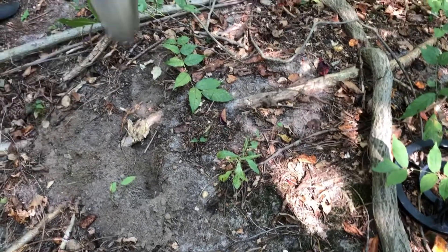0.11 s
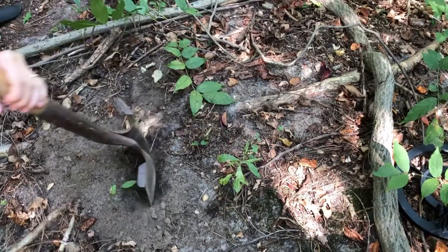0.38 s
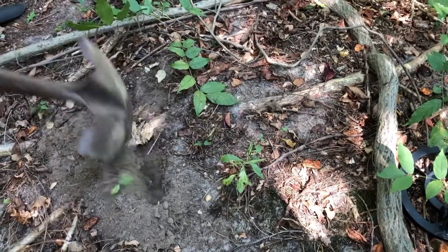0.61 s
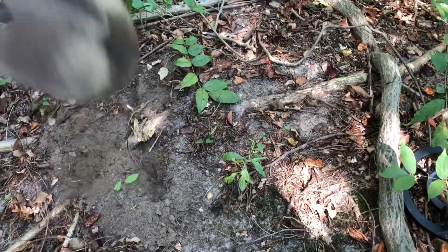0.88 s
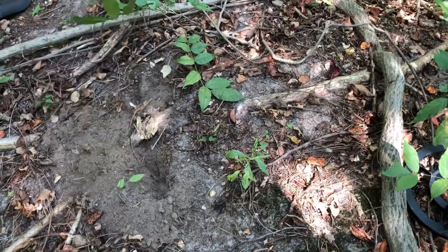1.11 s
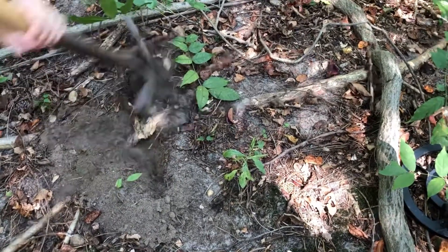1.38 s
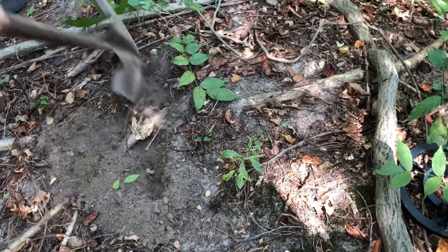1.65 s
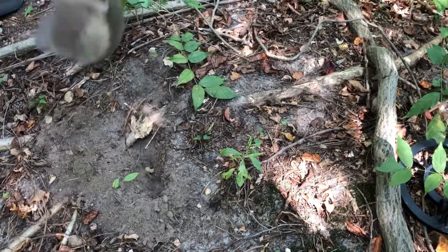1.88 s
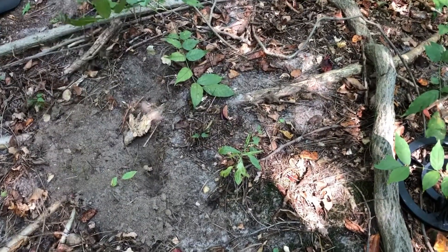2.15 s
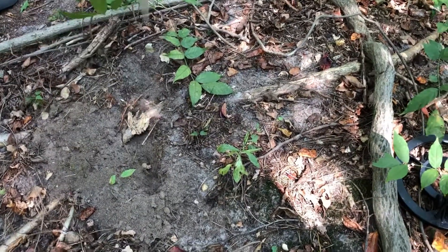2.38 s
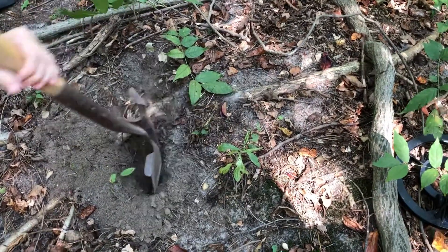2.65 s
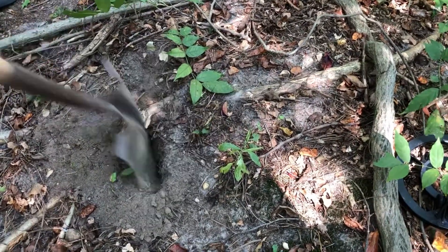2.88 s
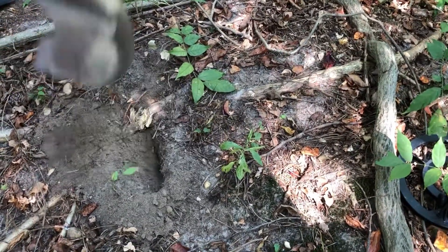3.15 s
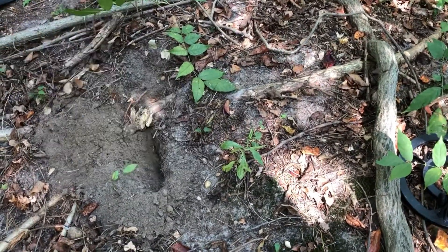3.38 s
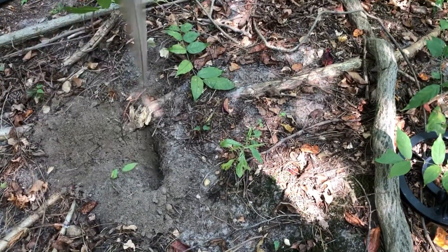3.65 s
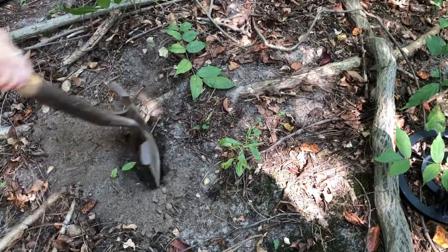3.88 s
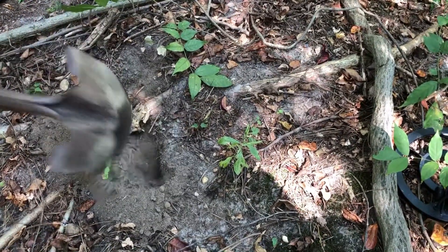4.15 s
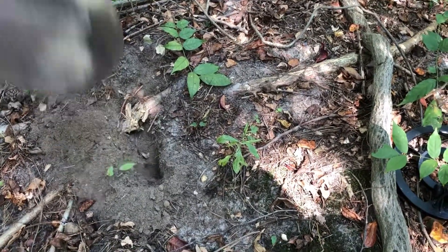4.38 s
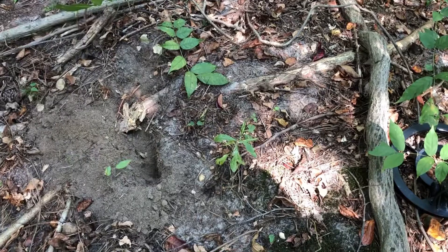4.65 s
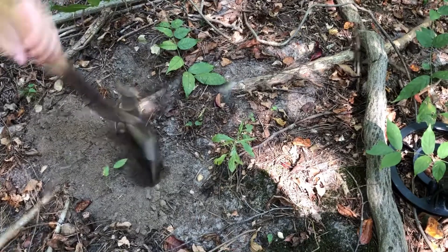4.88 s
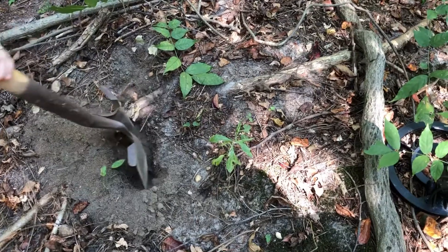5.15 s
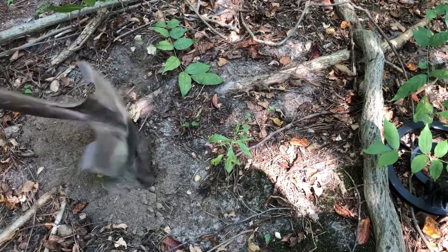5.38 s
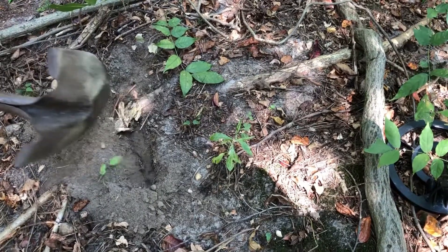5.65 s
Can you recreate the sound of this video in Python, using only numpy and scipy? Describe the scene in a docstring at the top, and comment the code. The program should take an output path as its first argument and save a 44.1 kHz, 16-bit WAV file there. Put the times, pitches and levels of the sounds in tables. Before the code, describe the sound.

Five evenly spaced, dull, gritty blows of a digging tool into woodland ground, with sliding dirt, small clicks and quiet crickets.

```python
"""Chopping rooty forest soil

A steel mattock chops five times: each thud glides down in pitch and booms in the ground, and earth crunches as grit.
Dragged free, the blade scrapes as sliding earth and rings in decaying modes; rootlets and crumbs are noise bursts.
Crickets chirp in arched tones, a faint far whistle is tones blurred by fast pitch shake,
and distant traffic and air are coloured noise."""
import sys
import numpy as np
from scipy import signal
from scipy.fft import rfft, irfft, next_fast_len
from scipy.io import wavfile
from scipy.ndimage import uniform_filter1d, map_coordinates

SR = 44100
rng = np.random.default_rng(int(sys.argv[2]) if len(sys.argv) > 2 else 0)


def waveform_to_disk(signal):
    """Save audio, clipped to [-1, 1], as 16-bit WAV at the path in sys.argv[1]."""
    frames = np.transpose(np.atleast_2d(signal))
    scaled = np.clip(frames, -1, 1) * 32767
    samples = np.round(scaled).astype(np.int16)
    wavfile.write(sys.argv[1], SR, samples)


def undo_db(level):
    """Turn decibels back into plain size, where 20 dB means ten times bigger."""
    steps = np.asarray(level, float) / 20
    return 10 ** steps


N = 254542  # length [samples]


def unit(x):
    """Normalisation: x scaled to rms 1."""
    return x / np.sqrt(np.mean(x ** 2) + 1e-20)


def along(points, hz):
    """Spectral interpolation: (frequency [Hz], value) points read on a log frequency axis."""
    f, value = np.transpose(points)
    return np.interp(np.log(hz + 1), np.log(f + 1), value)


def filtered(x, response):
    """Linear filtering: the spectrum of x times a complex response of frequency."""
    m = next_fast_len(N + 8192)
    return irfft(rfft(x, m) * response(np.fft.rfftfreq(m, 1 / SR)), m)[:N]


def wobble(rate):
    """Slow random modulation: a smooth curve through random knots, rate of them a second."""
    knots = rng.standard_normal(int(N * rate / SR) + 4)
    return map_coordinates(knots, [np.arange(N) * rate / SR])


def add(track, s, sound):
    """Superposition: mix sound into track from second s on."""
    part = track[max(round(s * SR), 0):][:len(sound)]
    part += sound[:len(part)]


# colour of far traffic and air: (frequency [Hz], relative level per Hz [dB])
WOODS_COLOUR = [(15, -2.5), (25, -35), (59, -0.5), (94, 6.5), (120, -4), (180, -13.5), (277, -21),
                (1100, -18), (2280, -31), (4490, -40), (6560, -38), (7920, -32.5), (9320, -46),
                (16000, -42.5)]
# swell of the far rumble: (time [s], relative level [dB])
TRAFFIC_SWELL = [(0, -3.5), (2, -0.5), (3, 1), (5.77, 1)]


def woods():
    """Coloured noise: far traffic and air, with the rumble swelling apart from the hiss."""
    t = np.arange(N) / SR
    colour = lambda hz: undo_db(along(WOODS_COLOUR, hz))
    low = lambda hz: 1 / (1 + (hz / 200) ** 4)
    rumble = filtered(rng.standard_normal(N), lambda hz: colour(hz) * low(hz))
    hiss = filtered(rng.standard_normal(N), lambda hz: colour(hz) * (1 - low(hz)))
    rumble *= undo_db(np.interp(t, *np.transpose(TRAFFIC_SWELL)) + 0.48 * wobble(2.9))
    hiss *= undo_db(0.31 * wobble(3.14))
    return undo_db(-53.5) * unit(rumble + hiss)


def chirp(hz, length_s, arch):
    """Frequency modulation: one wing stroke whose pitch arches up to hz and down again."""
    u = np.linspace(-1, 1, round(length_s * SR))
    phase = 2 * np.pi * np.cumsum(hz * (1 - arch * u * u)) / SR
    return (1 - u * u) * np.sin(phase)


# beat of the near cricket: (time [s], chirps so far [count])
CRICKET_BEAT = [(.014, 0), (1.252, 11), (2.973, 26), (4.461, 39), (4.802, 42), (5.571, 49), (5.689, 50)]


def crickets():
    """Stridulation: a near cricket on its beat, a lower one answering, and a far chorus at random."""
    out = np.zeros(N)
    s, count = np.transpose(CRICKET_BEAT)
    for start in np.interp(np.arange(count[-1] + 1), count, s):
        near_db, answer_db = -66.5 + rng.normal(0, 1.1), -76.5 + rng.normal(0, 4.7)
        add(out, start - 0.006, undo_db(near_db) * chirp(8750, 0.02, arch=0.049))
        add(out, start + 0.019, undo_db(answer_db) * chirp(7050, 0.019, arch=0.092))
    for when, pitch, size in rng.random((1600, 3)):
        far = chirp(8150 - 950 * pitch ** 1.5, 0.022, arch=0.036)
        add(out, when * N / SR, undo_db(-86.0 + 13.3 * size) * far)
    return out


# course of the far whistle: (time [s], mean pitch [Hz], mean level [dB])
WHISTLE_COURSE = [(2.989, 2640, -67.5), (3.06, 2715, -66.5), (3.15, 2526, -62.5), (3.28, 2680, -70.5),
                  (3.34, 2680, -72)]


def whistle():
    """Random frequency modulation: a tone and its octave whose pitch shakes so fast that they blur."""
    s, hz, db = np.transpose(WHISTLE_COURSE)
    t = np.arange(N) / SR
    pitch = np.interp(t, s, hz)
    low, high = (2 * np.pi * np.cumsum(pitch * (1 + shake * wobble(900))) / SR for shake in (0.15, 0.045))
    octave_db = np.interp(t, s, [0, -1.5, -13, -2, -2])  # the octave dips midway
    level = undo_db(np.interp(t, s, db, -120, -120) + 2.5 * wobble(55))
    return level * (np.sin(low) + undo_db(octave_db) * np.sin(2 * high))


# colour of breaking earth: (frequency [Hz], relative level per Hz [dB])
EARTH_COLOUR = [(350, 2), (600, 0.5), (834, -5), (1570, -1.5), (1880, -2), (3040, 0.5), (4650, -1),
                (10700, 2), (16000, -10)]


def grit(spread_db, clump_db, patch_db):
    """Granular noise: dense grains of uneven size in clumps of differing pitch, coloured like breaking earth."""
    sizes = undo_db(spread_db * wobble(900) + clump_db * wobble(160))
    spectrum = signal.stft(sizes * rng.standard_normal(N), nperseg=256)[2]
    patches = uniform_filter1d(rng.standard_normal(spectrum.shape), size=6, axis=0)  # over frequency
    patches = uniform_filter1d(patches, size=3, axis=1)  # over time
    grains = signal.istft(spectrum * undo_db(patch_db * unit(patches)), nperseg=256)[1][:N]
    return unit(filtered(grains, lambda hz: undo_db(along(EARTH_COLOUR, hz))))


def hump(t, rows, fall_db):
    """Exponential rise and decay: power of peaks that lose fall_db over their half length on each side."""
    return sum(undo_db(db - fall_db * np.abs(t - s) / half) ** 2 for s, db, half in rows)


# the blade dragged out of the cut, ever louder until free: (free at [s], level then [dB], swell [dB/s])
DRAGS = [(.605, -45.5, 178), (1.685, -53.5, 73), (2.871, -61, 51), (4.062, -52, 72), (5.45, -42.5, 114)]
# short scrapes of the edge past stones and roots: (time [s], peak level [dB], half length [s])
SCRAPES = [(0.612, -37.5, 0.013), (1.683, -45, 0.036), (2.641, -40, 0.017), (2.907, -52.5, 0.071),
           (4.132, -41.5, 0.026), (4.145, -40, .02), (5.286, -57, .04), (5.39, -41, 0.055),
           (5.463, -32, 0.014)]
# dry leaves stirred nearby: (time [s], peak level [dB], half length [s])
RUSTLES = [(.06, -64, 0.051), (1.208, -67.5, 0.046), (1.78, -65, 0.024), (2.08, -80, 0.033), (3.25, -72, 1),
           (3.42, -61.5, 0.11), (4.27, -60, 0.075)]


def loose_earth_db(still_db=-82, trickle_db=-62, trickle_fall=36, free_fall=439):
    """Incoherent addition: still litter, trickle into each cut, drags, scrapes and rustles add as powers."""
    t = np.arange(N) / SR  # both falls are in dB per second
    power = undo_db(still_db) ** 2 + hump(t, SCRAPES, fall_db=16) + hump(t, RUSTLES, fall_db=10.5)
    for s, *_ in CUTS:
        power += (t > s) * undo_db(trickle_db - trickle_fall * (t - s)) ** 2
    for s, db, swell in DRAGS:
        slope = np.where(t < s, swell, free_fall)
        power += undo_db(db - slope * np.abs(t - s)) ** 2
    return 10 * np.log10(power)


def slide(width_hz=110, quiet_db=-65, loud_db=-40):
    """Damped resonance: the harder earth grinds, the more it sounds through the blade's soil-damped modes."""
    db = loose_earth_db()

    def crumbly(hz):  # about half the amplitude well below 2.5 kHz and well above 10.5 kHz
        return (1 - 0.49 / (1 + (hz / 2500) ** 4)) * (1 - 0.5 / (1 + (10500 / (hz + 1)) ** 6))

    def damped(f):  # modes of one bandwidth and alternating sign
        total = 0
        for k, (centre, mode_db, _) in enumerate(np.concatenate(BLADE_MODES)):
            loss = 1j * f * width_hz
            total = total + (-1) ** k * undo_db(mode_db) * loss / (centre * centre - f * f + loss)
        return total

    earth = filtered(grit(spread_db=3, clump_db=1.2, patch_db=2.5), crumbly)
    share = np.interp(db, [quiet_db, loud_db], [0.05, 0.6])  # of the power
    through_blade = unit(filtered(earth, damped))
    return undo_db(db) * (np.sqrt(1 - share) * unit(earth) + np.sqrt(share) * through_blade)


# snapping rootlets and the louder falling crumbs: (time [s], peak level [dB], nominal centre [Hz])
SNAPS = [(.2895, -20, 5450), (.666, -43, 10000), (.927, -52.5, 2440), (.976, -45.5, 7160),
         (.998, -49, 11000), (1.029, -50, 5500), (1.94, -59, 8750), (3.202, -47, 6000),
         (1.395, -23.5, 2500), (2.07, -52.5, 2500), (2.274, -43.5, 5900), (2.464, -46.5, 10700),
         (2.5322, -18, 1940), (2.5425, -9.5, 6000), (2.559, -11, 11300), (2.632, -40, 4000),
         (2.646, -30.5, 2730), (2.904, -39.5, 3800), (3.412, -42, 4850), (3.572, -46, 7760),
         (3.773, -18.5, 8500), (4.049, -35.5, 5430), (5.165, -37, 4450), (5.26, -40, 9500),
         (5.284, -35.5, 3300), (5.318, -44, 7500), (5.635, -50, 10000), (5.656, -51, 4500)]


def snaps(t60=0.0054, rattle_t60=0.028, rattle_db=-9, crumbs_db=-64):
    """Impulsive noise: short band-passed bursts with a gritty rattle behind; small crumbs fall at random."""
    out, t = np.zeros(N), np.arange(SR // 30) / SR
    luck = rng.random((150, 3))
    crumbs = np.transpose([luck[:, 0] * N / SR, crumbs_db + 13 * luck[:, 1] ** 2, 2800 * 3.4 ** luck[:, 2]])
    for s, db, hz in [*SNAPS, *crumbs]:
        noise = rng.standard_normal((2, len(t)))
        burst = noise[0] * undo_db(-60 * t / t60)
        burst += noise[0] * np.abs(noise[1]) * undo_db(rattle_db - 60 * t / rattle_t60)
        band = [hz / 2.1, min(hz * 1.63, 0.33 * SR)]
        burst = signal.lfilter(*signal.butter(2, band, "bandpass", fs=SR), burst)
        add(out, s, undo_db(db) * burst / np.abs(burst).max())
    return out


# modes of the free blade, in five families that ring together: (frequency [Hz], relative level [dB], t60 [s])
BLADE_MODES = [
    [(1122, -9.5, 2.7), (1510, -12.5, 0.32)],
    [(1754, -16.5, 0.93), (1860, -17, 0.89), (2754, -12, 1.3), (3330, -16.5, 1.2)],
    [(2290, -3, 0.16), (3244, -3, 0.31), (3620, -8.5, 0.27), (5460, 0.5, 0.19)],
    [(4040, -10.5, 0.25), (4330, -6, 0.52), (4474, -5, 0.14)],
    [(6140, 3, 0.1), (6870, -3, 0.19), (7500, 3.5, 0.063), (8280, -2, 0.11), (9370, 3.5, 0.054),
     (9500, -26, .07), (10670, 3, 0.086), (12460, -28.5, 0.069)],
]
# knocks as the blade comes free: (time [s], time until it turns away [s], level of its lowest modes [dB],
# of its short modes [dB], of its middle modes [dB])
KNOCKS = [(0.61, 0.37, -52, -53.5, -45.5), (1.691, 0.13, -50, -55.5, -69), (4.128, 0.39, -47, -45, -49),
          (5.459, 0.16, -48.5, -45, -37.5)]
# second family of blade modes ringing, at some knocks and also between them:
# (time [s], time until it turns away [s], level [dB])
SECOND_FAMILY = [(0.64, 0.46, -48), (0.984, 0.25, -57.5), (1.689, 0.047, -54), (4.128, 0.49, -56.5)]


def blade(bloom=0.016, turn_s=0.07):
    """Modal synthesis: a scraping knock rings the modes at new strengths; long ones bloom as the soil lets go."""
    out, t = np.zeros(N), np.arange(SR)[:, None] / SR
    hz, mode_db, t60 = np.concatenate(BLADE_MODES).T
    sizes = [len(family) for family in BLADE_MODES]
    # one level per family; -120 dB leaves it silent
    strikes = [(s, facing_s, low, -120, short, middle, short) for s, facing_s, low, short, middle in KNOCKS]
    strikes += [(s, facing_s, -120, db, -120, -120, -120) for s, facing_s, db in SECOND_FAMILY]
    for s, facing_s, *family_db in strikes:
        luck = rng.standard_normal((2, len(hz)))
        db = mode_db + np.repeat(family_db, sizes) + luck[0] - 60 * t / t60
        db += 3.5 * np.sin(2 * np.pi * hz / 500 * t + 9 * luck[0])  # modes waver as the swinging blade turns
        rise = 1 - np.exp(-t / (bloom * np.minimum(t60, 0.6)))
        away = np.exp(-np.maximum(t - facing_s, 0) / turn_s)
        tones = np.sin(2 * np.pi * hz * t + 9 * luck[1])
        add(out, s, (undo_db(db) * rise * away * tones).sum(axis=1))
    return out


# the blade driving through earth: (time [s], length [s], entry level [dB], middle level [dB], end level [dB])
CUTS = [(0.285, 0.026, -52, -36, -30.5), (1.3927, 0.057, -34.5, -45, -38.5),
        (2.527, 0.039, -55, -23.5, -34.5), (3.762, 0.056, -34.5, -36, -33),
        (4.935, 0.033, -33.5, -32.5, -33.5)]


def cuts(spray_db=-47.5, spray_t60=0.27, stop_s=0.0069):
    """Fracture noise: earth crunches until the blade stops dead; thrown soil patters on."""
    level, t = np.zeros(N), np.arange(SR // 2) / SR
    for s, length, entry_db, middle_db, end_db in CUTS:
        course = [entry_db, middle_db, end_db, spray_db]
        db = np.interp(t, [0, length / 2, length, length + stop_s], course)
        decay_db = 60 * np.maximum(t - length, 0) / spray_t60
        add(level, s, undo_db(db - decay_db) * np.minimum(t / 0.0021, 1))
    return level * grit(spread_db=-0.5, clump_db=0.5, patch_db=1.0)


# thuds: (deepest swing [s], peak level [dB], pitch there [Hz], build-up [s], growth time constant [s])
THUDS = [(0.297, -10.5, 324.7, 0.0081, 0.0045), (1.401, -9, 276, 0.0065, 0.0012),
         (2.543, -16, 215, 0.0105, 0.0045), (3.7745, -11, 290, .009, 0.0042),
         (4.948, -11.5, 275, .0095, 0.0039)]
# modes of packed earth and roots: (frequency [Hz], relative level [dB], t60 [s])
GROUND_MODES = [(145.5, -1, 0.08), (71, -15.5, 0.23), (105, -11.5, 0.07), (215, -3, 0.052)]


def thuds(die_s=0.004, lag_s=0.0021, crack_db=-15, clod_db=-12, boom_db=-5, glide_cycles=2.79):
    """Dispersion: the ground carries high pitches faster, so each thud glides down, then the earth booms."""
    out = np.zeros(N)
    woody = signal.butter(2, [450, 1300], "bandpass", fs=SR)
    dull = signal.butter(2, [60, 260], "bandpass", fs=SR)
    since = np.arange(SR // 3) / SR
    for s, db, hz, lead, grow in THUDS:
        u = since - lead  # from the deepest swing
        t = np.maximum(u + lag_s, 0)  # from the start of the boom, lag_s before it
        turns = glide_cycles * (1 - np.exp(-u * hz / glide_cycles))
        swell = np.exp(np.minimum(u / grow, 0) - (np.maximum(u, 0) / die_s) ** 2)
        swell *= np.minimum(since / 0.00043, 1)
        thud = -swell * np.cos(2 * np.pi * turns)
        boom = 0
        for f, mode_db, t60 in GROUND_MODES:
            boom = boom + undo_db(mode_db - 60 * t / t60) * np.sin(2 * np.pi * f * t) * (1 - np.exp(-2.5 * f * t))
        noise = rng.standard_normal((2, len(t)))
        # the edge splits root fibres
        crack = unit(signal.lfilter(*woody, noise[0])) * undo_db(crack_db - 60 * since / 0.026)
        # lumps settle
        clods = unit(signal.lfilter(*dull, noise[1])) * undo_db(clod_db - 60 * t / 0.14)
        clods *= np.minimum(t / 0.0026, 1)
        add(out, s - lead, undo_db(db) * (crack + thud) + undo_db(db + boom_db) * (clods - boom))
    return out


def scene():
    """Superposition: all sources at one microphone."""
    background = woods() + crickets() + whistle()
    return (background + slide() + snaps() + blade() + cuts() + thuds())[None]


def low_pass(x):
    """Removes everything above the highest recorded frequency."""
    return signal.sosfilt(signal.butter(12, 16670, fs=SR, output="sos"), x)


def record(dry):
    """High-pass response: a small microphone drops the deepest bass."""
    heard = signal.lfilter(*signal.butter(2, 42, "highpass", fs=SR), dry)
    return low_pass(heard)


dry = scene()
out = record(dry)
waveform_to_disk(out)
```